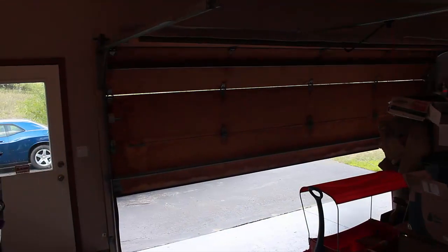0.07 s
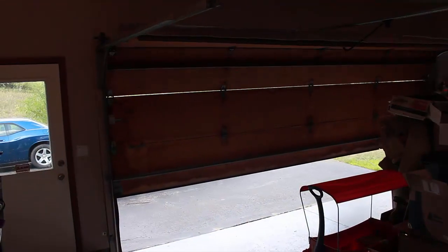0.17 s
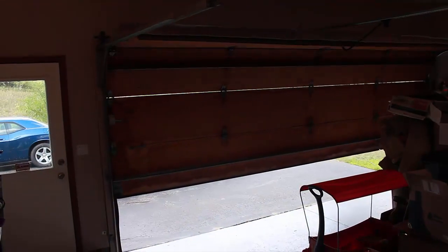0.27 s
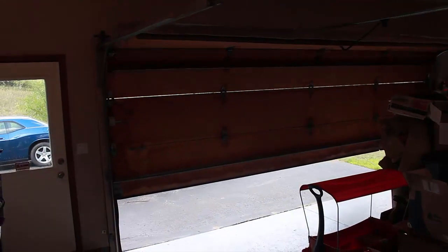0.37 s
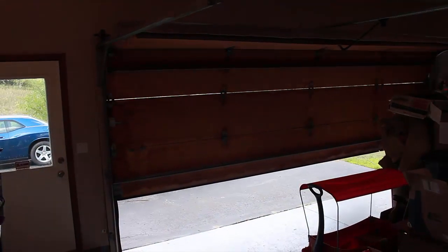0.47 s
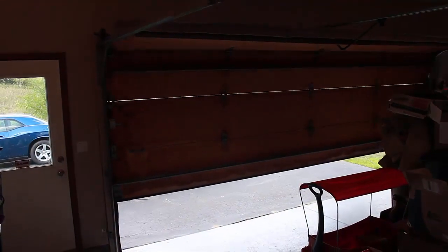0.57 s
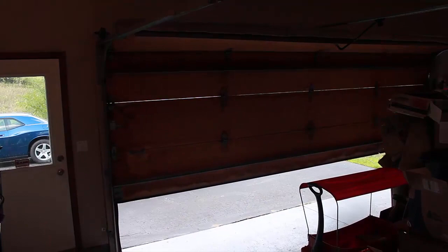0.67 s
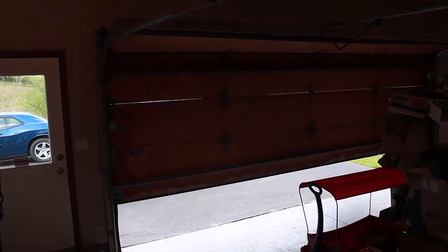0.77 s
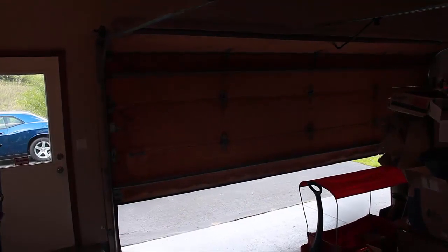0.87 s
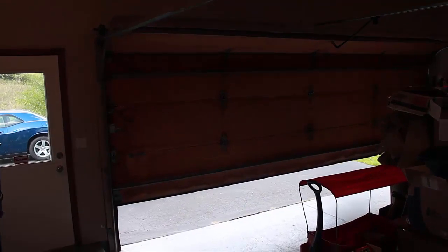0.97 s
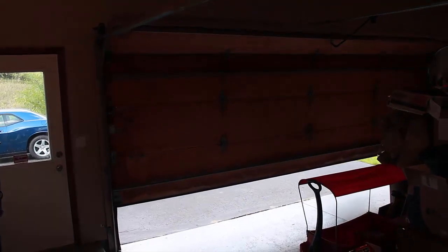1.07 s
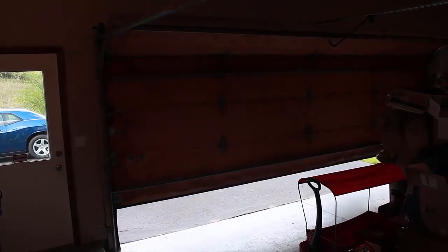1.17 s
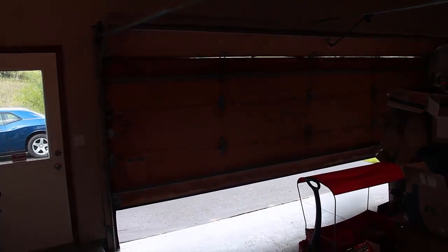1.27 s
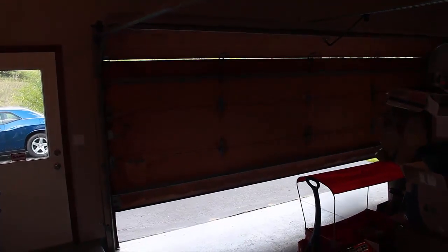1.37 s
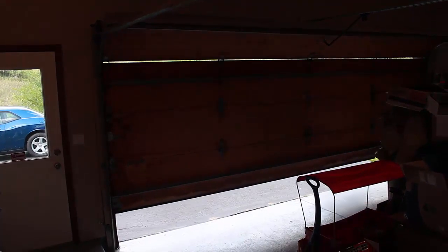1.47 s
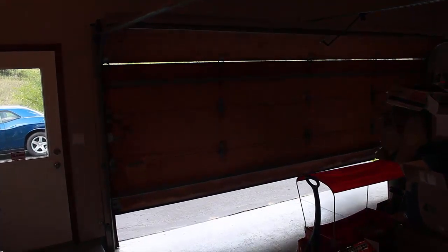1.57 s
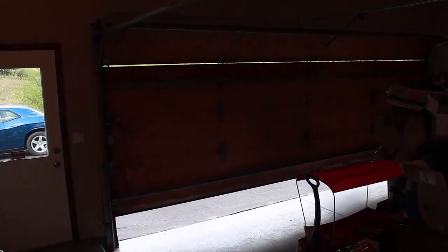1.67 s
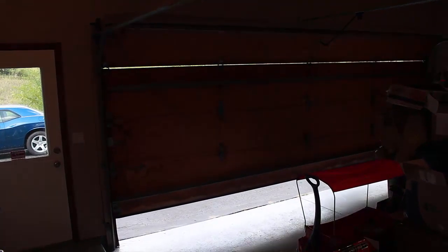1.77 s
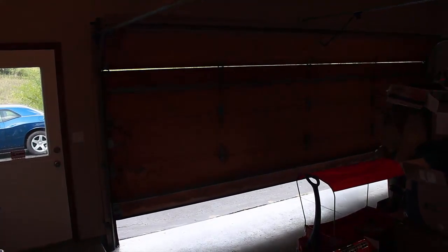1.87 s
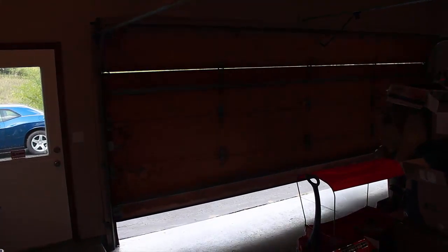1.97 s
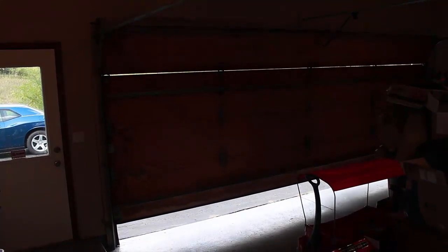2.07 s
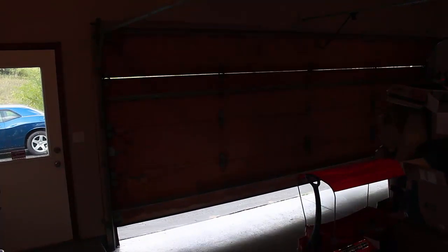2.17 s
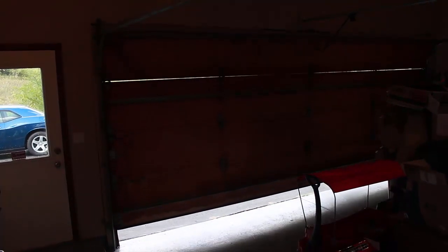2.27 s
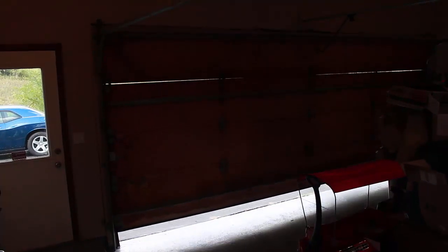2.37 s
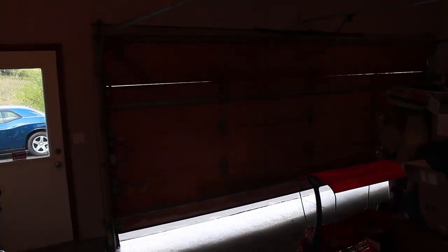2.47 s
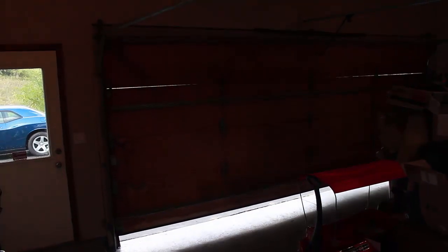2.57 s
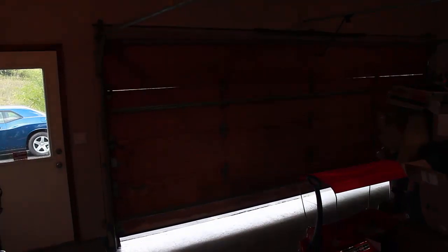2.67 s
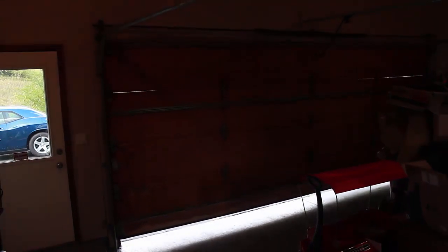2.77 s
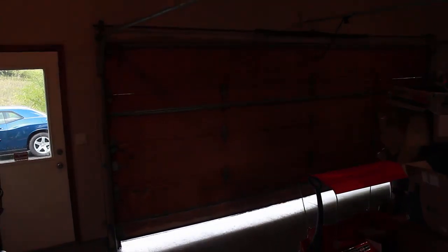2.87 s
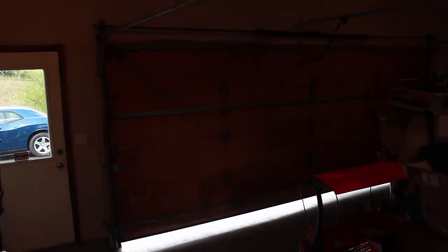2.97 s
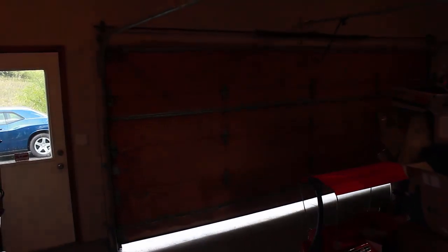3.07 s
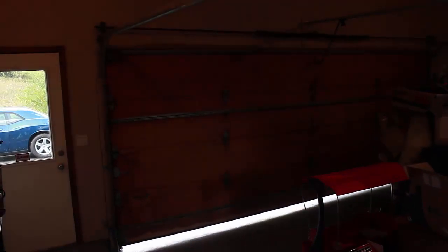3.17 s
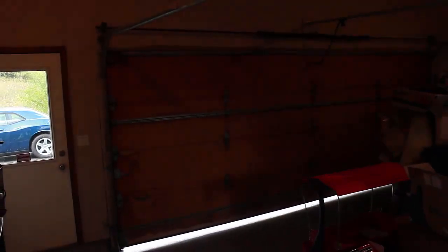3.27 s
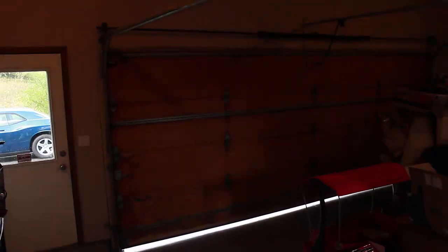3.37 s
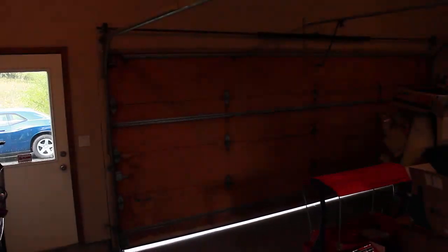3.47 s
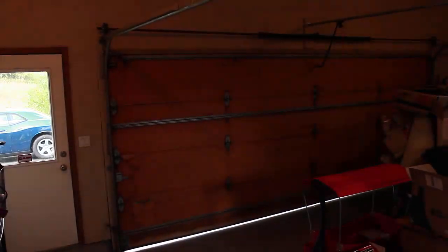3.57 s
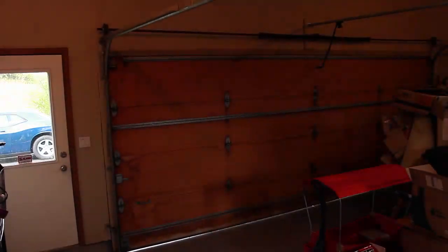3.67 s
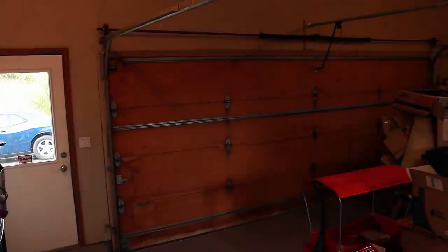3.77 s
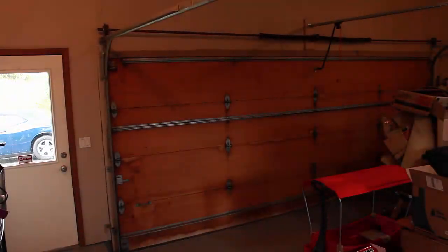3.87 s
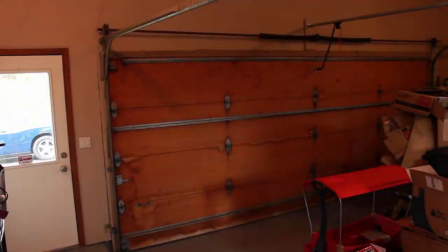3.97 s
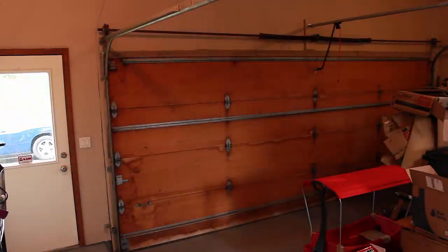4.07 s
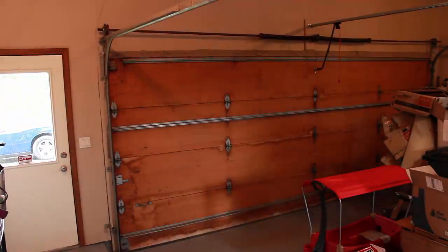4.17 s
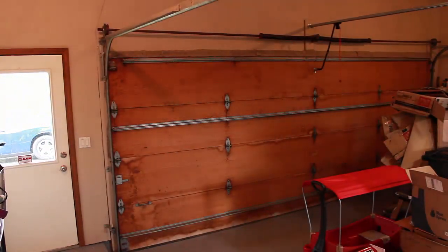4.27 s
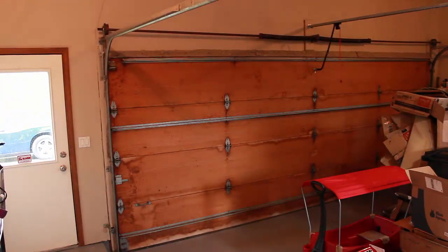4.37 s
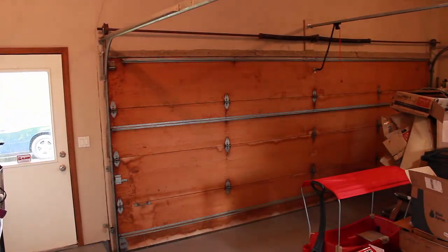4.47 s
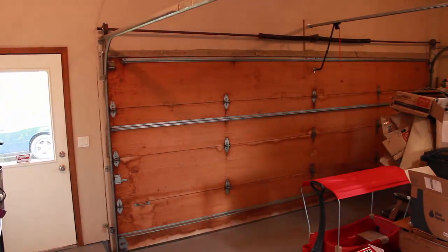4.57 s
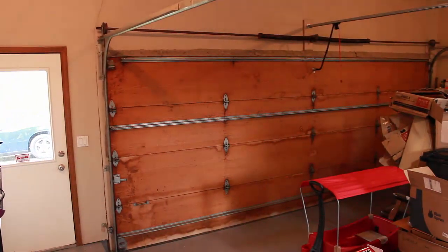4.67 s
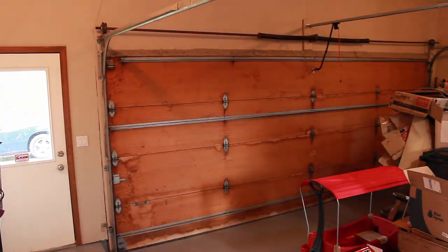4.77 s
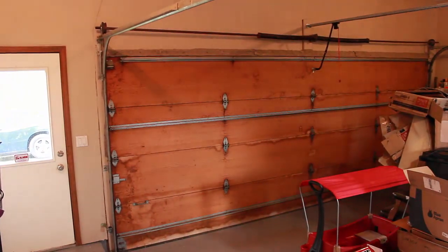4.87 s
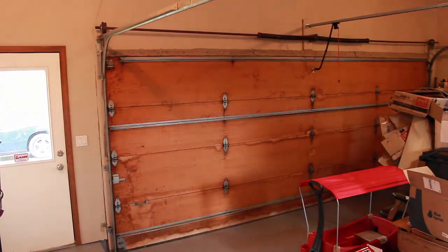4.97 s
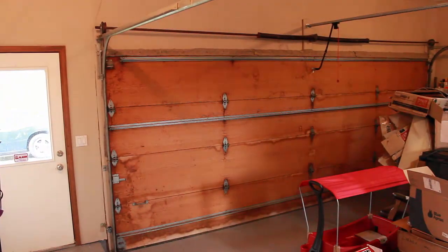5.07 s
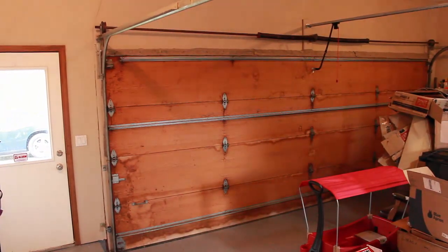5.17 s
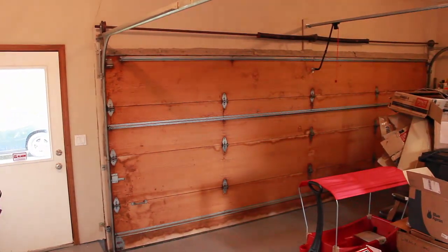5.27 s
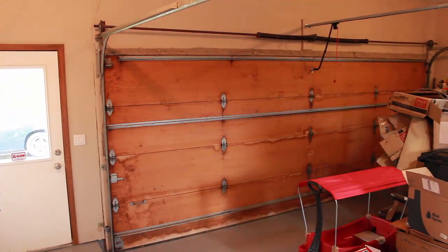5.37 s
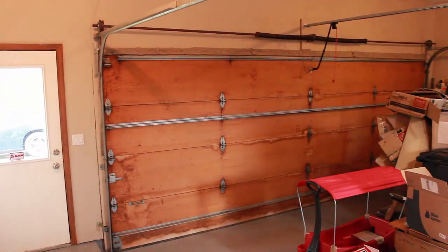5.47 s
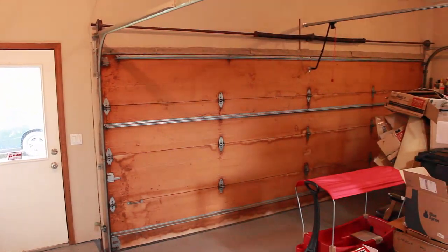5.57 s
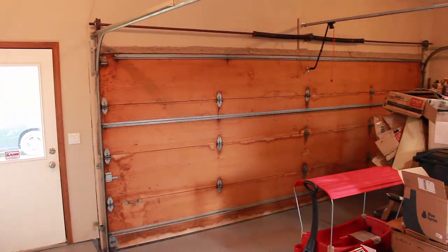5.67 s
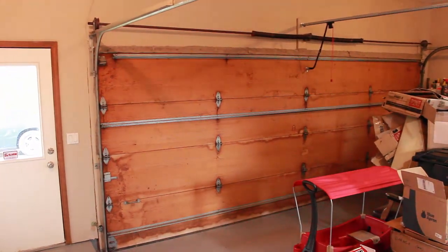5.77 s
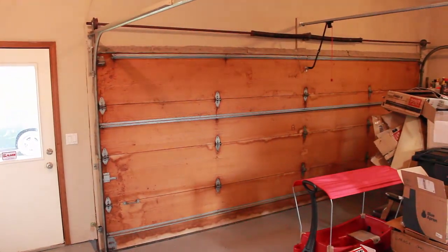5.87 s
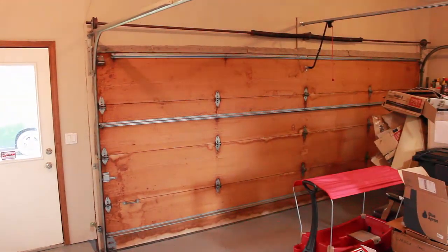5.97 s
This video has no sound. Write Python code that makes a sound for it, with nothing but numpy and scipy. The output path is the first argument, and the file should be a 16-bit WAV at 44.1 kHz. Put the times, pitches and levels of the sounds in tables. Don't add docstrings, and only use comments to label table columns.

```python
import sys
import numpy as np
from scipy import signal
from scipy.io import wavfile
from scipy.ndimage import uniform_filter1d

SR = 44100
rng = np.random.default_rng(int(sys.argv[2]) if len(sys.argv) > 2 else 0)


def master_out(mix):
    frames = np.transpose(np.atleast_2d(mix))
    ceiling = np.clip(frames, -1, 1)
    pcm = np.round(ceiling * 32767).astype(np.int16)
    wavfile.write(sys.argv[1], SR, pcm)


def ratio(d):
    e = np.asarray(d, float) / 20
    return 10 ** e


N = 264996
TIME = np.arange(N) / SR
STOP_S = 4.05


def evened(x):
    return x / np.sqrt(np.mean(x ** 2) + 1e-20)


def read(points, hz):
    f, value = np.transpose(points)
    return np.interp(np.log(hz + 1), np.log(f + 1), value)


def drift(hz, count=N):
    return evened(signal.lfilter(*signal.butter(2, hz, fs=SR), rng.standard_normal(count)))


def follow(s, db):
    return ratio(np.interp(TIME, s, db, right=-140))


def swells(s, length, db, floor_db):
    u = np.clip((TIME[::64, None] - s) / length, -.5, .5)
    power = (ratio(db) * np.cos(np.pi * u)) ** 2
    return np.interp(TIME, TIME[::64], np.sqrt(power.sum(1) + ratio(floor_db) ** 2))


def noise(points, size, patchy_db, weight=lambda hz: 1):
    frames, hz = 4 * N // size + 5, np.fft.rfftfreq(size, 1 / SR)
    a, b, patches = rng.standard_normal((frames, len(hz), 3)).T
    patches = uniform_filter1d(patches, size=4, axis=0)
    patches = evened(uniform_filter1d(patches, size=14, axis=1))
    spectrum = ratio(read(points, hz)) * weight(hz)
    z = (a + 1j * b) * ratio(patchy_db * patches) * spectrum[:, None]
    return evened(signal.istft(z, nperseg=size, noverlap=3 * size // 4)[1][:N])


def colour(x, points):
    gain = np.log(ratio(read(points, abs(np.fft.fftfreq(4096, 1 / SR)))))
    taps = np.fft.ifft(np.exp(np.conj(signal.hilbert(gain)))).real[:2048]
    return signal.oaconvolve(x, taps / np.linalg.norm(taps))[:N]


def resonate(x, hz, width):
    turn = np.exp(2j * np.pi * np.cumsum(hz * np.ones(len(x))) / SR)
    r = np.exp(-np.pi * width / SR)
    return 2 * (turn * signal.lfilter([1 - r], [1, -r], x / turn)).real


def bursts(s, db, t60, rise_s):
    power, t = np.zeros(N), TIME[:SR // 4]
    shape = (ratio(-60 * t / t60) * (1 - np.exp(-t / rise_s))) ** 2
    for at, level_db in zip(s, db):
        power[round(at * SR):][:len(t)] += ratio(2 * level_db) * shape
    return np.sqrt(power) * rng.standard_normal(N)


def rings(s, db, hz, t60, rise_s):
    out, t = np.zeros(N), TIME[:SR // 8]
    rise = 1 - np.exp(-t / rise_s)
    for at, level_db, f in zip(s, db, hz):
        ring = ratio(level_db - 60 * t / t60) * rise * np.sin(2 * np.pi * f * t)
        out[round(at * SR):][:len(t)] += ring
    return out


def tone(span_s, hz, gain, wander, flutter_db, flutter_hz):
    out, span = np.zeros(N), slice(round(span_s[0] * SR), round(span_s[1] * SR))
    count = len(out[span])
    turns = np.cumsum((hz + out)[span] * (1 + wander * drift(30.1, count=count))) / SR
    level = gain[span] * ratio(flutter_db * drift(flutter_hz, count=count))
    out[span] = np.sqrt(2) * level * np.sin(2 * np.pi * turns)
    return out


def deep(x):
    return signal.sosfiltfilt(signal.butter(4, 90, fs=SR, output="sos"), x)


def air():
    # (frequency [Hz], density [dB per Hz])
    room = [(18, -31), (30, -20.5), (50, 1.5), (66, 2), (95, -19.5), (126, -19.5), (144, -17.5),
            (160, -2.5), (236, 1), (262, -3), (431, -4.5), (545, -10), (1020, -13.5), (2410, -23),
            (2820, -25.5), (11000, -31), (15400, -30)]
    # (frequency [Hz], side under mid [dB])
    apart = [(60, -1), (110, -15.5), (200, -34), (380, -63.5), (700, -45.5), (1290, -40), (2380, -36),
             (4390, -38.5), (8110, -28), (15000, -39.5)]
    room_db, hum_hz, hum_db = -56, 123, -73
    mid = ratio(room_db) * noise(room, size=2048, patchy_db=1.2)
    whirr = resonate(resonate(rng.standard_normal(N), 2380, 300), 2380, 300)
    mid += ratio(-75 + 2.5 * drift(8.06)) * evened(whirr)
    mid += ratio(hum_db + 1.54 * drift(6)) * np.sin(2 * np.pi * hum_hz * TIME)
    width = lambda hz: ratio(read(apart, hz))
    side = ratio(room_db - 15.5) * noise(room, size=1024, patchy_db=3.0, weight=width)
    side -= .2 * deep(mid)
    return np.array([mid + side, mid - side])


def rolling():
    # (time [s], rolling effort [dB], strain on the steel parts [dB])
    travel = [(0.0, -30.5, 0), (0.13, -26, 0.5), (0.38, -34.5, 1), (0.475, -26.5, -2.5), (0.509, -25, 4.5),
              (0.589, -31, 1.5), (0.95, -36, 0.5), (1.02, -33, -1), (1.32, -33, 0), (1.5, -28, 0),
              (1.62, -33, 0.5), (1.83, -29, -0.5), (2.47, -31, 1.5), (3.29, -25.5, -0.5),
              (3.58, -28.5, -3.5), (3.94, -30.5, -1.5), (3.986, -22, 1), (4.04, -29.5, 0.5)]
    centres = [230, 750, 1800, 5000, 12000]
    # (frequency [Hz], density [dB per Hz])
    roll = [(53, -60), (90, -31), (288, -14.5), (320, -16.5), (433, -19), (638, -15), (880, -19.5),
            (1120, -27), (1350, -25.5), (1600, -27.5), (1950, -27), (2250, -29.5), (2700, -33),
            (3200, -32.5), (3650, -32.5), (7910, -48.5), (15400, -49)]
    # (centre [s], length [s], level [dB])
    shudder = [(.45, 0.55, -49), (0.743, 0.11, -52), (1.104, 0.46, -49.5), (1.425, 0.2, -43),
               (1.563, 0.37, -47), (2.79, 0.2, -48), (2.967, 0.23, -45), (4.056, 0.34, -46.5)]
    # (frequency [Hz], density [dB per Hz])
    frame = [(18, -36), (36, -22), (54, 2), (68, 0.5), (97, -22.5), (130, 1.5), (170, -19), (290, -120)]
    # (level at base effort [dB], share of effort, share of strain, fade after the stop [dB/s])
    parts = [
        (-36.5, 0.26, -0.3, 103),
        (-38, 1, -1.12, 132),
        (-36, 1, 0.99, 129.5),
        (-40, 0.5, 0.65, 101),
        (-50.5, .3, 0.58, 119.5),
    ]
    base_db, coast_s, frame_fade_db = -30, 0.037, 60
    s, effort_db, strain_db = np.transpose(travel)
    effort_db = np.interp(TIME, s, effort_db) - base_db
    strain_db = np.interp(TIME, s, strain_db)
    moving = ratio(-frame_fade_db * np.maximum(TIME - STOP_S, 0))
    out = moving * swells(*np.transpose(shudder), -71.0) * noise(frame, size=4096, patchy_db=-1.0)
    looks = zip(parts, (0.48, 2.77, 2.5, 1.5, 1.5), (0.026, 0.29, 0.52, 0.27, 0.11))
    for k, ((db, effort, strain, fade_db), patchy_db, chatter) in enumerate(looks):
        share = lambda hz: np.interp(np.log(hz + 1), np.log(centres), np.arange(5) == k) ** .5
        bumps = (rng.random(N) < 120 / SR) * np.minimum(rng.exponential(1, N), 2)
        bumps = 1 + chatter * signal.lfilter([1], [1, -np.exp(-1 / (0.01 * SR))], bumps)
        rest_s = STOP_S + coast_s * (1 + 0.31 * max(k - 2, 0))
        level_db = db + effort * effort_db + strain * strain_db
        level_db -= fade_db * np.maximum(TIME - rest_s, 0)
        out += ratio(level_db) * bumps * noise(roll, size=1024, patchy_db=patchy_db, weight=share)
    return out


def groans():
    # (start [s], length [s], pitch [Hz], width [Hz], level [dB])
    loads = [(0, 0.28, 1080, 160, -36), (0.077, 0.11, 2170, 760, -37), (0, 0.98, 171.7, 47, -41),
             (0.503, 0.32, 529, 190, -35.5), (0.948, 0.32, 1380, 97, -40), (1.1, 0.48, 176.7, 57, -40),
             (1.33, 0.25, 2120, 110, -48), (1.498, 0.92, 211.6, 25, -44.5), (1.758, 0.37, 1920, 150, -37.5),
             (1.84, .17, 2000, 250, -39), (2.5, 0.5, 169.4, 14, -46), (2.737, 0.26, 935, 460, -31.5),
             (2.741, 0.048, 6030, 370, -42), (3.031, 0.19, 1104, 99, -28.5), (3.052, 0.36, 830, 99, -33),
             (3.299, 0.27, 882, 110, -32.5), (3.21, 0.35, 1120, 180, -29), (3.236, 0.25, 285, 7.4, -35),
             (3.467, 0.22, 1060, 250, -33), (3.551, 0.53, 216.2, 38, -35.5),
             (3.597, 0.56, 1160, 290, -31.5), (3.693, 0.33, 549, 38, -38), (4.012, 0.17, 1020, 70, -35),
             (3.505, 0.54, 665, 11, -35.5)]
    slow_s, sag = 3.0, .17
    lumps_db = 2
    out = np.zeros(N)
    for start, length, mid_hz, width, db in loads:
        t = np.arange(-length / 2, length / 2, 1 / SR)
        sinks = start > slow_s and (500 < mid_hz < 950 or start < slow_s + .1)
        hz = mid_hz * (1 - sag * t * sinks * (1 + 3 * (width > 60)))
        rub = (rng.standard_normal(SR) * ratio(lumps_db * drift(49, count=SR)))[:len(hz)]
        ring = evened(resonate(resonate(rub, hz, width), hz, 2 * width))
        ring = evened(ring + 30 / width * np.sin(2 * np.pi * np.cumsum(hz) / SR))
        fade = signal.windows.tukey(len(hz), .35)
        out[round(start * SR):][:len(hz)] += ratio(db) * ring * fade
    return out


def drive():
    # (centre [s], length [s], mesh level [dB], octave level [dB])
    mesh = [(.2, 0.86, -33, -47), (.55, .3, -52, -48), (.83, 0.14, -26.5, -30), (.97, 0.049, -22.5, -45),
            (1.4, 0.16, -30, -36), (1.6, 0.26, -30, -39), (1.95, 0.36, -27, -52),
            (2.26, 0.26, -28.5, -30.5), (2.62, 0.76, -43, -32.5), (3.02, 0.37, -26, -54),
            (3.22, 0.18, -52, -39)]
    # (centre [s], length [s], level [dB])
    rail = [(.05, 0.11, -56), (.52, 0.039, -26.5), (.69, 0.16, -35), (.81, 0.19, -41.5),
            (.995, 0.13, -38.5), (1.1, 0.08, -37), (1.19, 0.19, -39), (1.37, 0.097, -41),
            (1.53, 0.1, -36.5), (1.59, 0.043, -37), (1.86, 0.45, -40), (2.14, 0.18, -55), (2.28, 0.11, -43),
            (2.48, 0.23, -37.5), (2.68, 0.28, -34), (2.89, 0.28, -37), (3.08, 0.17, -33.5),
            (3.23, 0.31, -34.5), (3.5, .3, -50)]
    mesh_hz, rail_hz = 324.5, 1380
    s, length, db, octave_db = np.transpose(mesh)
    gear = tone((0, 3.3), mesh_hz, swells(s, length, db - 8, -65.5), 0.0045, 0.57, 27)
    gear += tone((0, 3.3), 2 * mesh_hz, swells(s, length, octave_db - 8, -56), .008, 2.5, 40)
    return gear + tone((0, 3.6), rail_hz, swells(*np.transpose(rail), -64), .009, 1.8, 60)


def judder():
    # (time [s], peak level [dB], panel ring [Hz])
    lumps = [(0.014, -20, 1076), (0.042, -18.5, 1049), (0.093, -19, 1144), (0.108, -20, 1100),
             (0.121, -16, 1110), (0.139, -14.5, 1190), (0.152, -19, 1100), (0.19, -20, 1050),
             (0.25, -18.5, 1044), (0.432, -22, 2070), (0.445, -24, 2060), (0.478, -28, 2100),
             (1.452, -23, 867), (1.484, -18, 880), (2.721, -17, 950), (3.104, -13, 912),
             (3.142, -26.5, 1080), (3.152, -25, 1110), (3.166, -19, 1420), (3.19, -20, 1030),
             (3.26, -18, 710), (3.335, -17, 842), (3.366, -18, 802), (3.385, -13, 1046),
             (3.424, -17.5, 1140), (3.448, -28.5, 1130), (3.469, -20.5, 1260), (3.5, -15, 1238),
             (3.54, -16.5, 1200), (3.572, -25.5, 705), (3.616, -17, 1250), (3.657, -19, 1217),
             (3.701, -16, 557), (3.725, -24.5, 641), (3.738, -20, 557), (3.755, -22, 1250),
             (3.781, -22, 1260), (3.822, -12.5, 657), (3.865, -16, 640), (3.899, -16.5, 570),
             (3.903, -19.5, 1250), (3.934, -15, 1100), (3.972, -17, 1210)]
    s, db, hz = np.transpose(lumps)
    blow = bursts(s, db + 3, .07, .003)
    struck_hz = hz[np.maximum(np.searchsorted(s, TIME) - 1, 0)]
    body = resonate(resonate(blow, struck_hz, 350), struck_hz, 600)
    return body + rings(s, db - 2, hz, .06, .0015)


def fizz():
    # (time [s], peak level [dB])
    puffs = [(0.0672, -36), (0.1436, -33.5), (0.2209, -36), (0.4324, -44.5), (0.4908, -46.5),
             (0.5287, -37.5), (0.599, -40.5), (0.7228, -39), (0.7527, -35.5), (1.045, -39), (1.1588, -40),
             (1.1937, -41), (1.2221, -37), (1.2615, -33), (1.3069, -38), (1.3573, -35), (1.3917, -33.5),
             (1.5459, -37), (1.6546, -39), (1.697, -39), (1.7439, -36.5), (1.8432, -41), (1.8946, -39.5),
             (1.9445, -34), (2.0792, -36), (2.158, -36.5), (2.2528, -37.5), (2.2947, -35.5), (2.365, -38),
             (2.4423, -38), (2.4967, -36), (2.6249, -36), (2.7172, -32), (2.7616, -32), (2.823, -37),
             (2.8983, -34.5), (2.9417, -34.5), (3.0011, -32), (3.0619, -30.5), (3.1183, -37),
             (3.2146, -34.5), (3.2735, -35), (3.3169, -35), (3.3817, -39), (3.4301, -40), (3.5124, -42),
             (3.6711, -41), (3.7599, -36.5), (3.9295, -35), (3.9764, -26)]
    # (frequency [Hz], density [dB per Hz])
    puff_tone = [(6000, -29.5), (9000, -2), (12000, 3.5), (15500, 2.5)]
    s, db = np.transpose(puffs)
    return colour(bursts(s, db - 4.5, 0.13, .006) * ratio(2.5 * drift(150.8)), puff_tone)


def knocks():
    # (time [s], peak level [dB],
    # hinge ring [Hz])
    hinge_knocks = [(0.221, -13.5, 1616), (0.493, -11, 2624), (0.497, -10, 900), (0.502, -4.5, 1410),
                    (0.508, -12.5, 2475), (0.516, -15, 3340), (0.522, -16, 1440), (0.529, -12, 2985),
                    (0.535, -13.5, 2260), (0.549, -15, 1437), (0.56, -16, 2120), (0.575, -14.5, 976),
                    (0.59, -18, 1590), (0.609, -12.5, 1775), (0.625, -18, 1510), (0.655, -15.5, 1367),
                    (0.695, -9, 2142), (0.7, -14, 1337), (0.745, -15, 1764), (0.773, -16, 1790), (0.856, -20, 2105),
                    (0.949, -18, 1380), (1, -17.5, 1430), (1.044, -11, 1380), (1.11, -20, 1360),
             (1.134, -20, 1790), (1.225, -21.5, 1760), (1.265, -23.5, 1850), (1.306, -20, 1790),
             (1.744, -15.5, 2000), (1.835, -16, 1890), (1.89, -18, 1830), (1.926, -14.5, 1750),
             (1.986, -19.5, 1870), (2.039, -24, 2060), (2.106, -10.5, 1890), (2.141, -15, 1930),
             (2.192, -15.5, 830), (2.273, -13, 1980), (2.319, -17, 840), (2.447, -12, 1907),
             (2.636, -18, 1380), (2.735, -17, 1690), (2.837, -15.5, 1360), (2.87, -16.5, 866),
             (2.898, -11.5, 964), (3.001, -9, 1355), (3.044, -13, 1120), (3.061, -12.5, 1150),
             (3.086, -15.5, 1150), (3.114, -12, 944), (3.209, -8.5, 1030), (3.276, -10.5, 1380),
             (3.305, -11.5, 700), (3.972, -15, 1260), (3.982, -10, 1203), (3.996, -10.5, 1893),
             (4.007, -11, 1405), (4.022, -11.5, 1992)]
    # (frequency [Hz], density [dB per Hz])
    crack_tone = [(350, -19.5), (600, -1.5), (1050, 0), (1390, 2.5), (1570, 2), (1930, 1), (2960, -3),
                  (4310, -9.5), (9000, -42.5), (11700, -48), (19800, -120)]
    # (time [s], peak level [dB])
    joints = [(0.0679, -19.5), (0.1432, -17.5), (0.2259, -24), (0.4312, -30), (0.4918, -26), (0.501, -18.5),
              (0.512, -22.5), (0.7225, -28), (0.753, -32.5), (0.86, -28.5), (0.947, -20.5), (1.0455, -25.5),
              (1.1599, -22), (1.2199, -21), (1.278, -19), (1.355, -27.5), (1.3987, -18), (1.48, -24),
              (1.7453, -18), (1.83, -24), (1.9443, -25.5), (2.0792, -29), (2.161, -20), (2.2946, -13),
              (2.31, -16.5), (2.33, -22), (2.36, -25), (2.52, -25), (2.6244, -27), (2.7178, -21),
              (2.7583, -18.5), (2.8225, -34.5), (2.9, -26.5), (2.9422, -27.5), (3.0003, -13),
              (3.0614, -15.5), (3.1178, -12.5), (3.2106, -16.5), (3.274, -18.5), (3.4244, -27),
              (3.6706, -22.5), (3.7599, -23.5), (3.85, -35.5), (3.9295, -21), (3.9759, -11.5), (4.0, -14)]
    # (frequency [Hz], density [dB per Hz])
    click_tone = [(2000, -22), (3500, 0), (6000, -5), (9000, -15), (12000, -24), (15500, -28)]
    rattle_per_s, rattle_db = 9, -37
    s, db, hz = np.transpose(hinge_knocks)
    blow = bursts(s, db - 9, .07, .001)
    struck_hz = hz[np.maximum(np.searchsorted(s, TIME) - 1, 0)]
    crack = ratio(-1.0) * colour(blow, crack_tone) + ratio(-3.0) * resonate(blow, struck_hz, 180)
    crack += rings(s, db - 9, hz, 0.071, 0.0013)
    thump_tone = [(80, -20.0), (180, 7.0), (550, -1.0), (900, -28.0)]
    thump = colour(bursts(s, db - 32.0, 0.099, 0.016), thump_tone)
    s, db = np.transpose(joints)
    when, size = rng.random((round(rattle_per_s * STOP_S), 2)).T
    s = np.append(s, when * STOP_S)
    db = np.append(db, rattle_db + 8 * (size - .5))
    return crack + thump + colour(bursts(s, db - 10.5, 0.068, 0.004), click_tone)


def whistle():
    # (time [s], level [dB])
    course = [(3.07, -44), (3.085, -33), (3.1, -46), (3.135, -46), (3.145, -37), (3.27, -40), (3.386, -30),
              (3.658, -27.5), (3.772, -36), (3.982, -34), (4.02, -37), (4.055, -45), (4.135, -44),
              (4.178, -51), (4.203, -38), (4.23, -45), (4.3, -51), (4.336, -48), (4.45, -58)]
    # (centre [s], length [s], level [dB])
    octave = [
        (3.55, .3, -67),
        (3.83, 0.42, -62),
    ]
    whistle_hz = 3939
    s, db = np.transpose(course + [(4.56, -86)])
    unsteady = ratio(1.1 * drift(30) * np.clip((abs(TIME - 3.65) - .35) / .1, 0, 1))
    out = tone(s[[0, -1]], whistle_hz, unsteady * follow(s, db), .0002, .4, 25)
    return out + tone((3.3, 4.05), 2 * whistle_hz, swells(*np.transpose(octave), -90), .0002, 1, 25)


def shriek():
    # (centre [s], length [s], level [dB])
    grips = [(4.048, .045, -28), (4.074, .045, -12.5), (4.091, .03, -16), (4.108, .04, -14),
             (4.123, .03, -17), (4.14, .07, -10.5), (4.172, .04, -17.5), (4.2, .045, -21.5),
             (4.222, .03, -24), (4.246, .055, -15.5), (4.277, .035, -21.5), (4.295, .03, -36),
             (4.314, .04, -26), (4.35, .06, -34), (4.38, .04, -48), (4.405, .06, -42), (4.44, .05, -57),
             (4.475, .075, -49), (4.525, .06, -58), (4.58, .12, -66)]
    # (centre [s], length [s], level [dB])
    octave = [(4.052, 0.066, -40), (4.083, 0.037, -34), (4.113, 0.027, -29), (4.14, 0.027, -30.5),
              (4.156, .03, -36), (4.186, 0.04, -31), (4.219, 0.036, -35.5), (4.252, 0.051, -39),
              (4.285, .04, -51), (4.314, 0.075, -46), (4.352, 0.036, -49), (4.386, 0.048, -50.5),
              (4.442, .07, -60), (4.481, 0.028, -59), (4.537, .08, -69)]
    # (multiple of the pitch, level under the shriek [dB])
    overtones = [(2.5, -44), (3, -32), (4, -38), (5, -39)]
    # (frequency [Hz], density [dB per Hz])
    scrape = [(3000, -32), (4500, 8.5), (7000, -4), (10000, -7.5), (15500, -24.5)]
    # (centre [s], length [s], level [dB])
    between = [
        (4.085, 0.061, -47.5),
        (4.15, .07, -39.5),
        (4.21, 0.078, -42.5),
        (4.285, .08, -49),
        (4.36, .09, -59),
    ]
    span_s, scrape_db = (4.02, 4.68), -32
    rasp_db, rasp_hz, rasp_width = -24.5, 2350, 780
    gain = swells(*np.transpose(grips), -91)
    since = np.maximum(TIME - span_s[0], 0)
    hz = 2840 - 24 * np.exp(-since / .045)
    out = tone(span_s, hz, gain, .0009, .55, 110)
    out += tone(span_s, 2 * hz, swells(*np.transpose(octave), -95), .0035, 2.2, 150)
    rasp = resonate(rng.standard_normal(N), rasp_hz, rasp_width)
    rasp = evened(resonate(rasp, rasp_hz, 2 * rasp_width))
    out += abs(uniform_filter1d(gain, size=5000)) * ratio(rasp_db) * rasp
    soft = abs(uniform_filter1d(gain, size=2000))
    out += soft * ratio(scrape_db) * colour(rng.standard_normal(N), scrape)
    out += tone(span_s, 1.503 * hz, swells(*np.transpose(between), -95), .002, 1.5, 90)
    for multiple, under_db in overtones:
        overtone_gain = soft * ratio(under_db + 2 - 16 * (multiple - 1) * since)
        out += tone(span_s, multiple * hz, overtone_gain, .0016, 4, 75)
    return out


def ticks():
    # (time [s], peak level [dB], pitch [Hz])
    creaks = [
        (4.9094, -54.5, 4760),
        (5.5318, -53, 4930),
        (5.8132, -54, 4400),
        (5.8294, -64, 4400),
    ]
    out, t = np.zeros(N), TIME[:600]
    for s, db, hz in creaks:
        out[round(s * SR):][:600] += ratio(db - 60 * t / 0.0087) * np.sin(2 * np.pi * hz * t)
    return out


def hollowed(x):
    # (centre [s], length [s], pitch [Hz], width [Hz], share taken out)
    hollows = [(.15, 0.39, 750, 300, 0.5), (.1, 0.22, 1600, 400, 0.42), (2.05, .2, 1500, 350, .4),
               (3.75, .4, 100, 50, .6), (.4, 0.28, 1370, 500, .85), (0.974, .22, 1110, 300, .7),
               (1.28, .45, 2580, 500, 0.51), (1.54, 0.43, 1110, 300, .4), (2.31, 0.38, 1490, 400, .5),
               (2.65, 0.22, 2800, 500, 0.49), (3.72, 0.51, 1700, 400, 0.94)]
    out = x.copy()
    for s, length, hz, width, share in hollows:
        span = slice(max(round((s - length / 2) * SR), 0), round((s + length / 2) * SR))
        fade = signal.windows.tukey(len(x[span]), .5)
        out[span] -= share * fade * resonate(x[span], hz, width)
    return out


def garage(x, t60):
    taps = np.zeros(SR // 2)
    at = np.arange(200, len(taps) - 22, 22)
    taps[at + rng.integers(0, 22, len(at))] = rng.choice([-1., 1.], len(at))
    taps *= ratio(-60 * TIME[:len(taps)] / t60)
    return signal.oaconvolve(x, taps / np.linalg.norm(taps))[:N]


def scene():
    hits = knocks() + judder() + ticks()
    door = hollowed(rolling() + hits + ratio(-5) * garage(hits, .4))
    door += drive() + groans() + whistle() + shriek() + fizz()
    uneven = ratio(-34 + 3 * drift(2) - 60 * np.maximum(TIME - STOP_S, 0))
    body = .85 * resonate(door, 620, 250) + 1.2 * resonate(door, 1750, 700)
    lean = .15 * deep(door) + uneven * garage(body, .1)
    return np.array([door - lean, door + lean]) + air()


def low_pass(x):
    return signal.sosfilt(signal.butter(12, 15570, fs=SR, output="sos"), x)


def record(dry):
    offset = [
        [.0008],
        [.0014],
    ]
    taps = signal.firwin(401, 16100, window=("kaiser", 9), fs=SR)
    mix = signal.oaconvolve(dry, taps[None], "same") + offset
    return low_pass(mix)


dry = scene()
out = record(dry)
master_out(out)
```